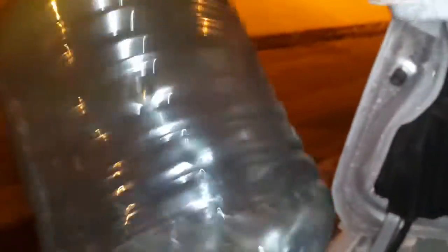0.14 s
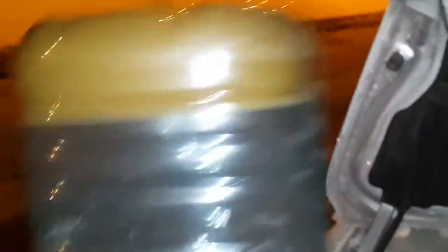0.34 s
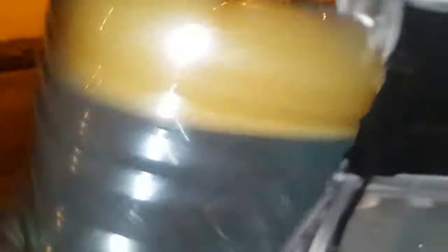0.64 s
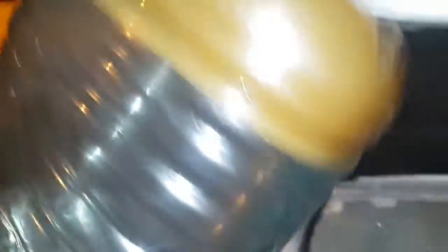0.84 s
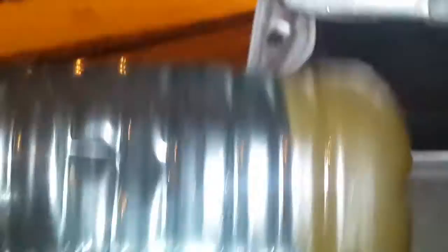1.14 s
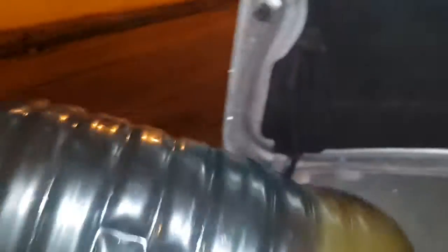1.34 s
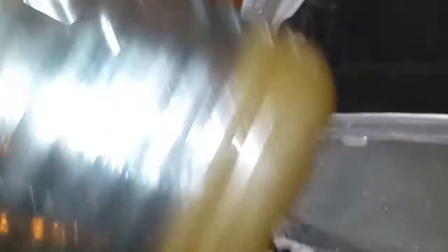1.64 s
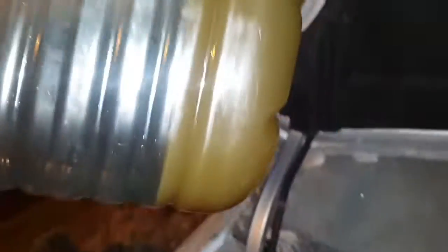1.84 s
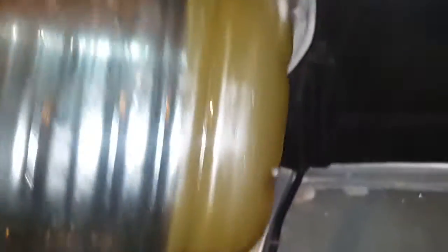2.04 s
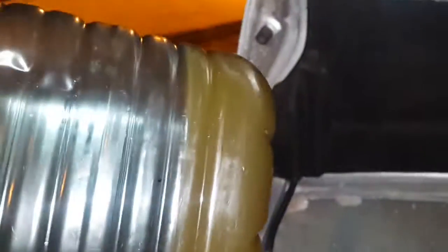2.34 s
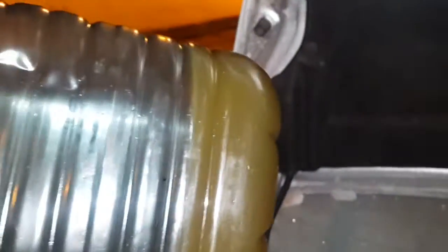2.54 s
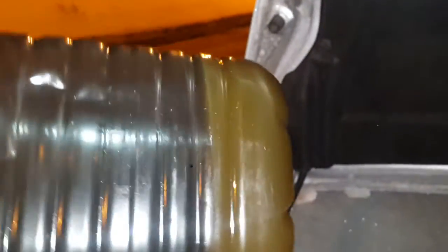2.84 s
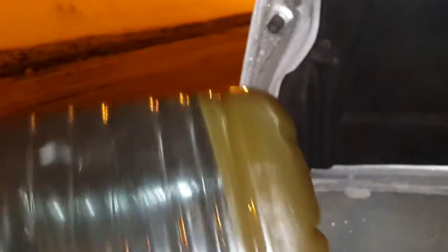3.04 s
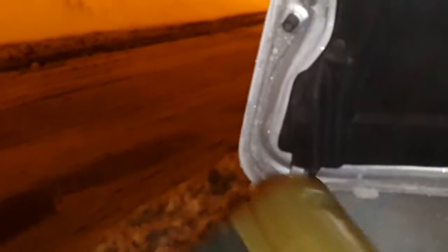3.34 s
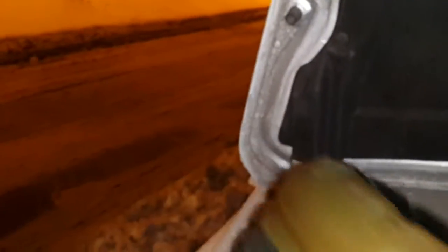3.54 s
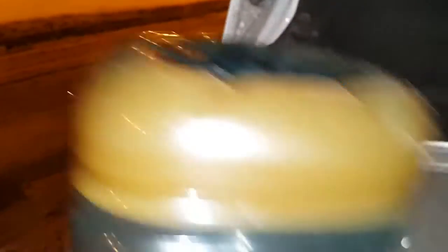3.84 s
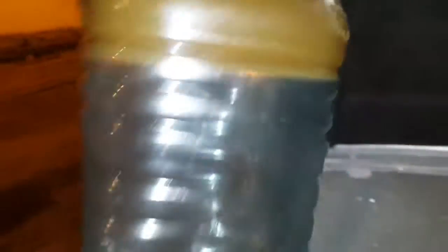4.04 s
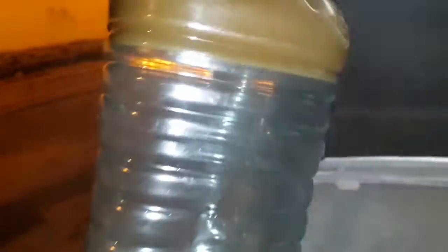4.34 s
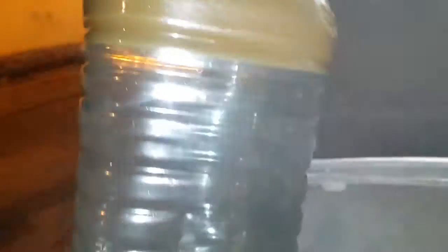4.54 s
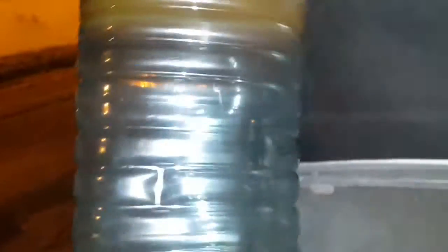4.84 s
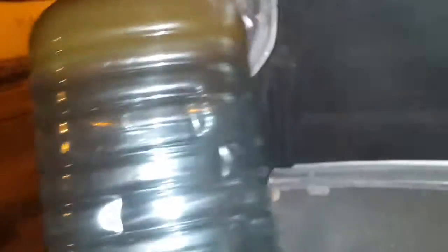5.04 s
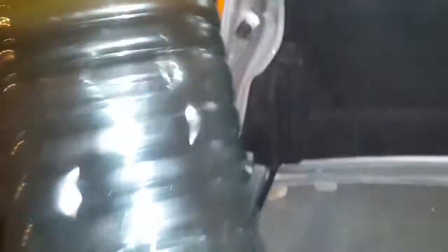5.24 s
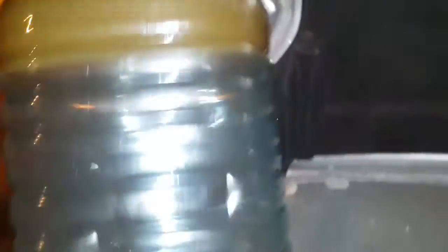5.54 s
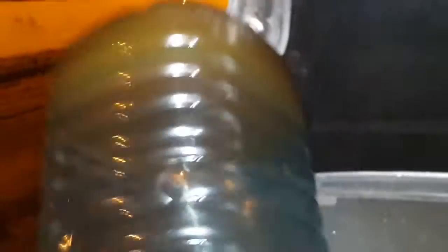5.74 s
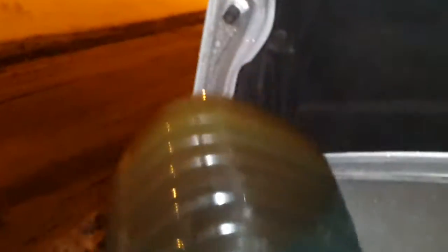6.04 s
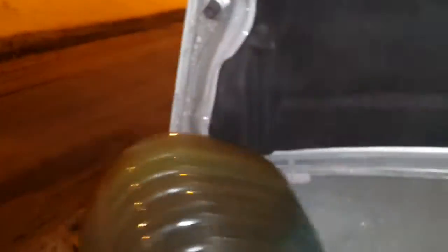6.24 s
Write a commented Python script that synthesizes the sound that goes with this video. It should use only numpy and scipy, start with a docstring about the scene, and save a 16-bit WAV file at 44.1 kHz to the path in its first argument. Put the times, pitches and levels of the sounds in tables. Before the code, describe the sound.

A thin plastic bottle is handled close to the microphone outdoors, its sides buckling with short hollow pops and its creases snapping crisply. Two pops come just after the start, followed by a loud crackling cluster at about 0.45 seconds and more pops and crunches from 1.1 to 1.4 seconds. It then goes nearly quiet until 3 seconds. Between 3 and 4.1 seconds there are light plastic ticks and a few soft, low bumps of fingers on the microphone. A brief, sharp crackle comes at 4.3 seconds, then a lull, and a loud pop with a crack at 5.5 seconds. From 6 to 6.3 seconds the bottle pops and crunches in a dense, loud run. A sleeve rustles softly with the arm's movements. Underneath, very faintly, a distant road swells and sinks, with light hiss and a barely audible high whine.

```python
"""A thin ribbed plastic bottle, turned over in a cold hand close to a handheld stereo recorder.
Its panels buckle in and out with a ringing pop, and its creases snap in splutters of tiny slips.
A sleeve rustles as the arm moves, and the grip thuds on the recorder's body. The place is outdoors
at night, by an open car: a distant road murmurs under faint steady whines and microphone hiss."""
import sys
import numpy as np
from scipy import signal
from scipy.io import wavfile

SR = 44100
rng = np.random.default_rng(int(sys.argv[2]) if len(sys.argv) > 2 else 0)


def digitize_waveform(pressure):
    """Quantize a signal to 16-bit integers and store it at the path in sys.argv[1].

    Rows of a 2-D input are taken as channels; values are limited to [-1, 1].
    """
    field = np.atleast_2d(pressure).T
    bounded = np.clip(field, -1, 1)
    quanta = np.round(bounded * 32767).astype(np.int16)
    wavfile.write(sys.argv[1], SR, quanta)


N = 281786


def panel_pops(motion):
    """A bottle panel flips within a cycle, rings at its pitch and shakes the whole wall."""
    # panels buckling: t/s, peak level/dB, panel f/Hz
    pops = [(0.1441, -7.5, 544), (0.1757, -5, 570), (0.426, -5.5, 557), (0.4442, -21, 550),
            (0.4512, -8, 675), (0.4596, -11.5, 351), (0.8496, -34, 313), (1.1268, -8.5, 665),
            (1.1961, -16, 535), (1.2088, -14, 496), (1.396, -17.5, 432), (1.4052, -13.5, 567),
            (3.282, -36, 611), (3.606, -36.5, 377), (3.7033, -35, 490), (4.2618, -20.5, 1174),
            (4.29, -34, 466), (4.4414, -36, 435), (4.817, -38, 304), (5.4907, -6, 1130),
            (5.4957, -9.5, 550), (5.974, -28.5, 273), (5.9871, -25.5, 576), (5.994, -18.5, 1080),
            (6.0025, -3, 1100), (6.0057, -6, 284), (6.0189, -11.5, 563), (6.0346, -13, 436),
            (6.1098, -10.5, 955), (6.112, -8.5, 600), (6.1748, -18, 1120), (6.2325, -16, 595),
            (6.2982, -10.5, 550), (6.2995, -12.5, 1050), (6.32, -16, 870), (6.344, -25.5, 510)]
    # modes of the bottle wall: f/Hz, relative level/dB, t60/s
    wall_modes = [(295.8, -5, 0.077), (476, -4, 0.008), (560, 6, 0.029), (698, 3.5, 0.034),
                  (818, 10.5, 0.013), (960, -10.5, 0.043), (1360, -16.5, 0.014), (1660, -31, 0.031),
                  (1860, -13.5, 0.055), (2250, -30, 0.089)]
    low_hz, high_hz = 370, 900   # pitch range of the faint pops
    faint = [(s, db, low_hz * (high_hz / low_hz) ** draw) for s, db, draw in faint_events(motion, -41)]
    events = list(pops) + faint
    out, t = np.zeros((2, N)), np.arange(SR // 5) / SR
    strengths_db = rng.normal(0, 3, (len(events), len(wall_modes)))
    for (s, peak_db, hz), chance_db in zip(events, strengths_db):
        flip_time = t * hz * 20.3
        flip = np.gradient(flip_time ** 2 * np.exp(-flip_time))
        # the wall goes on settling in small uneven jolts as soft as the flip
        jolts = rng.standard_normal(len(t)) * amp(-30.5 - 60 * t / 0.081)
        push = flip + np.convolve(jolts, flip[:SR // 100])[:len(t)]
        # modes near the panel's own pitch are shaken most
        shaken_db = chance_db - 4 * np.abs(np.log2(np.array(wall_modes)[:, 0] / hz))
        wall = sum(amp(db + shake_db) * ring(push, mode_hz, t60)
                   for (mode_hz, db, t60), shake_db in zip(wall_modes, shaken_db))
        swing = ring(flip, hz, t60=1.9 / hz) * hz / 1500   # the panel gathers speed over its first cycle
        pop = ring(swing, hz, t60=0.023) + amp(-3.5) * wall
        add(out, s, np.tile(pop, (2, 1)), peak_db, pan_db=0.86)
    return out


def crease_snaps(motion):
    """A crease gives way: a crack, a dying splutter of tiny slips, a faint longer tail."""
    # creases, from lone ticks to long crunches: t/s, peak level/dB, tilt/(dB per octave), t60/s
    snaps = [(0.4266, -15, -12, 0.017), (0.4497, 1, 5.5, 0.056), (0.4588, -9, 1.5, 0.055),
             (1.1173, -20.5, -8, 0.0076), (1.1271, -15.5, -5.5, 0.055), (1.1806, -23, 9.5, 0.016),
             (1.196, -9.5, 8, 0.043), (1.3965, -6.5, 2.5, 0.031), (1.404, -10, 7, 0.064),
             (2.094, -35, 0.5, 0.0056), (3.2065, -28, 6.5, 0.01), (3.2826, -20, 15, 0.0078),
             (3.3493, -21.5, 8.5, 0.019), (3.4946, -23, 4.5, 0.0064), (3.6679, -29.5, 7, 0.014),
             (3.7023, -33, 10, 0.02), (4.2619, -14.5, -12, 0.045), (4.2901, -6.5, 12.5, 0.0067),
             (5.4898, -8.5, -1, 0.05), (5.5735, -22, 7, 0.0073), (5.994, -17, -10, 0.017),
             (6.0028, -7, -4.5, 0.058), (6.1099, -4.5, 3, 0.033), (6.175, -6, 9, 0.055),
             (6.299, -3.5, 8, 0.057)]
    # spectrum of a snap before its tilt: f/Hz, relative density/dB
    spectrum = [(590, -36), (1000, -9), (1570, 3), (2080, -3.5), (5500, -11), (7100, -19.5), (7980, -26),
                (14100, -38), (16000, -42)]
    tick_tilt_db, tick_t60 = 8.5, 0.023
    splutter_db, alike = 5.5, 0.42   # unevenness of the slips; weight of the noise both sides share
    ticks = [(s, db, tick_tilt_db, tick_t60) for s, db, _ in faint_events(motion, -38)]
    out, t = np.zeros((2, N)), np.arange(SR // 4) / SR
    hz = np.fft.rfftfreq(1024, 1 / SR)
    for s, peak_db, tilt_db, t60 in list(snaps) + ticks:
        colour_db = at_hz(spectrum, hz + 1) + tilt_db * np.log2(np.maximum(hz, 1000) / 3000)
        squared_colour = signal.firwin2(255, hz, amp(2 * colour_db), fs=SR)
        colour = signal.minimum_phase(squared_colour, n_fft=4096)   # takes the root of the magnitude
        common, left, right = rng.standard_normal((3, len(t)))
        slips = amp(splutter_db * np.repeat(rng.standard_normal(len(t) // 40 + 1), 40)[:len(t)])
        splutter = slips * amp(-60 * t / t60)
        tail = amp(-25.5 - 60 * t / (7.5 * t60))
        crack = common * amp(12) * np.exp(-t / 0.00011)
        noise = alike * common + np.sqrt(1 - alike ** 2) * np.array([left, right])
        snap = signal.lfilter(colour, 1, crack + (splutter + tail) * noise)
        add(out, s, snap, peak_db, pan_db=3)
    return out


def faint_events(motion, db, count=10, spread_db=3):
    """Chance pops or ticks, likelier the faster the arm moves: t/s, level/dB, a draw from 0 to 1."""
    when, size, draw = rng.random((count, 3)).T
    effort = np.cumsum(motion ** 2)
    times = np.searchsorted(effort[:-SR // 10] / effort[-SR // 10], when) / SR
    return zip(times, db + spread_db * (2 * size - 1), draw)


def arm_motion():
    """The arm's movement as a gain: each stroke rises, holds and falls."""
    # strokes of the arm: t/s on reaching full speed, hold/s, relative level/dB
    strokes = [(0.106, .03, -50), (0.283, .12, -49), (.68, .04, -66), (3.217, .1, -59.5), (3.362, .11, -49),
               (3.6, .08, -54), (4.078, .15, -47.5), (4.453, .8, -62.5), (5.423, .16, -51.5),
               (5.753, 0.48, -63)]
    rise_db_per_s, fall_db_per_s = 129, 75
    t = np.arange(N) / SR
    gains = [amp(db - rise_db_per_s * np.maximum(s - t, 0) - fall_db_per_s * np.maximum(t - s - hold, 0))
             for s, hold, db in strokes]
    return np.max(gains, axis=0)


def sleeve_rustle(motion):
    """A sleeve near the microphone rustles as the arm moves."""
    # rustling cloth: f/Hz, relative density/dB
    spectrum = [(120, -37.5), (200, -19.5), (328, -7), (432, -11), (671, -9.5), (2090, -14.5),
                (5130, -11.5), (11100, -23), (14600, -19), (16000, -40.5)]
    return banded_noise(spectrum, patchy_db=1.2, flicker_hz=25) * motion


def grip_thuds():
    """Handling noise: fingers shift on the recorder in soft low bumps, stronger at the left port."""
    # bumps of the grip: t/s, peak level/dB
    thuds = [(1.608, -53.5), (2.357, -53), (3.053, -39), (3.169, -47.5), (3.257, -46.5), (3.959, -40),
             (3.998, -35), (4.046, -37), (4.076, -40.5)]
    thud_hz = 105
    out, t = np.zeros((2, N)), np.arange(SR // 5) / SR
    press = np.sin(np.pi * np.minimum(t * thud_hz, 1)) ** 2
    bump = ring(np.gradient(press), thud_hz, t60=0.021)
    for s, peak_db in thuds:
        add(out, s, np.tile(bump, (2, 1)), peak_db, pan_db=4)
    return out


def distant_road():
    """The low murmur of a road far off, with a low rumble that swells and sinks as the arm moves."""
    # road murmur: f/Hz, relative density/dB
    spectrum = [(18, -35), (30, 11.5), (48, -5), (297, -4.5), (552, -10), (955, -8.5), (1950, -9),
                (2360, -11.5), (4000, -21.5), (5080, -18.5), (9000, -26), (11700, -69), (19800, -120)]
    # swells of the murmur: t/s, relative level/dB
    swells = [(0, -60), (.4, -48.5), (.6, -64.5), (2.9, -60), (3.6, -50), (3.8, -55), (4.2, -52.5),
              (5.7, -53), (6.39, -63)]
    times, level_db = np.transpose(swells)
    gain = amp(np.interp(np.arange(N) / SR, times, level_db))
    return banded_noise(spectrum, patchy_db=1, flicker_hz=10) * gain


def whines():
    """Faint steady electrical tones whose level wavers a little."""
    # electrical tones: f/Hz, rms level/dB
    tones = [(6460, -82), (7806, -94.5)]
    t = np.arange(N) / SR
    waver = amp(2 * drift(4))
    return waver * sum(np.sqrt(2) * amp(db) * np.sin(2 * np.pi * hz * t) for hz, db in tones)


def microphone_hiss():
    """The microphone's own faint, bright noise floor."""
    # hiss: f/Hz, relative density/dB
    spectrum = [(940, -31.5), (1600, -17), (6590, -9), (8470, -11), (14400, -10), (16000, -23.5)]
    return banded_noise(spectrum, patchy_db=0.4, flicker_hz=5) * amp(-73)


def banded_noise(spectrum, patchy_db, flicker_hz):
    """Half-octave bands of stereo noise, each with its own level, flicker and width; rms 1."""
    # stereo image of the noise: f/Hz, left-right correlation
    likeness = [(60, -0.093), (180, 1), (550, 0.39), (1650, -0.45), (4970, 0.51), (15000, 0.29)]
    out, together = 0, drift(flicker_hz / 2)
    edges = 30 * 2 ** np.arange(0, 9.6, .5)
    edges = edges[(edges > spectrum[0][0]) & (edges < 1.5 * spectrum[-1][0])]
    white = rng.standard_normal((2, 2, N))
    for k, (low, high) in enumerate(zip(edges, edges[1:])):
        band = signal.butter(2, [low, high], "band", fs=SR, output="sos")
        mid, side = signal.sosfilt(band, white[k % 2])
        hz = np.sqrt(low * high)
        alike = np.clip(at_hz(likeness, hz), -1, 1)
        gain = amp(at_hz(spectrum, hz) + patchy_db * (together + drift(flicker_hz)))
        out = out + gain * (np.sqrt(1 + alike) * mid + np.sqrt(1 - alike) * side * [[1], [-1]])
    return rms_one(out)


def amp(db):
    """Decibels to gain."""
    return 10 ** (np.asarray(db) / 20)


def rms_one(x):
    """Scale to rms 1."""
    return x / np.sqrt(np.mean(x ** 2) + 1e-20)


def at_hz(points, hz):
    """Read a table on a log-frequency axis."""
    table_hz, values = np.transpose(points)
    return np.interp(np.log(hz), np.log(table_hz), values)


def drift(rate_hz):
    """A slow random wander of rms 1, drawn every 40 samples."""
    pole = np.exp(-80 * np.pi * rate_hz / SR)
    slow = signal.lfilter([1], [1, -2 * pole, pole * pole], rng.standard_normal(N // 40 + 2002))[2000:]
    return np.interp(np.arange(N) / 40, np.arange(len(slow)), rms_one(slow))


def ring(push, hz, t60):
    """A decaying mode driven by push."""
    radius, angle = amp(-60 / (t60 * SR)), 2 * np.pi * hz / SR
    return signal.lfilter([0, np.sin(angle)], [1, -2 * radius * np.cos(angle), radius * radius], push)


def add(track, s, sound, peak_db, pan_db):
    """Mix a stereo event in at its time and peak; positive pan_db leans left."""
    start = round(s * SR)
    sound = sound[:, :N - start] / np.abs(sound.mean(axis=0)).max()
    track[:, start:start + sound.shape[1]] += sound * amp(peak_db + pan_db * np.array([[.5], [-.5]]))


def ports(near, lag_s, shade_hz=8600):
    """The right microphone port, behind the recorder's body, hears the bottle later and duller."""
    left, right = near
    late = np.interp(np.arange(N) - lag_s * SR, np.arange(N), right)
    return np.array([left, signal.lfilter(*signal.butter(1, shade_hz, fs=SR), late)])


def scene():
    """Bottle, sleeve and hand close to the microphone, over road, hiss and whines."""
    motion = arm_motion()
    noises = sleeve_rustle(motion) + distant_road() + microphone_hiss()
    lean_left = amp([[3.5], [1.5]])
    panels = ports(panel_pops(motion), lag_s=0.00015)
    creases = ports(crease_snaps(motion), lag_s=0.0003065)
    return panels + creases + grip_thuds() + noises * lean_left + whines()


def record(dry):
    """The microphone loses the deepest bass, peaks clip near full scale, the top is cut steeply."""
    bass_cut_hz, top_cut_hz = 64, 16800
    heard = signal.sosfilt(signal.butter(2, bass_cut_hz, "high", fs=SR, output="sos"), dry)
    clipped = np.clip(heard, -.95, .95)
    return signal.sosfilt(signal.cheby2(14, 90, top_cut_hz, fs=SR, output="sos"), clipped)


dry = scene()
out = record(dry)
digitize_waveform(out)
```